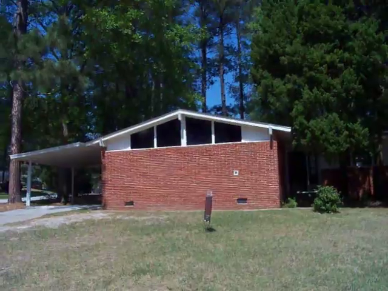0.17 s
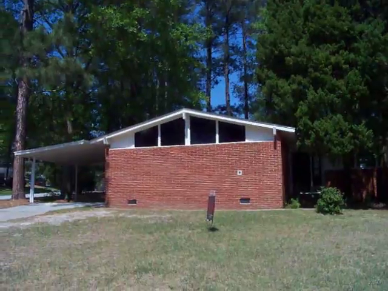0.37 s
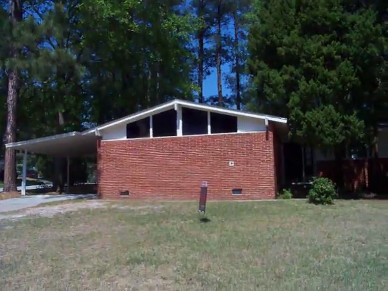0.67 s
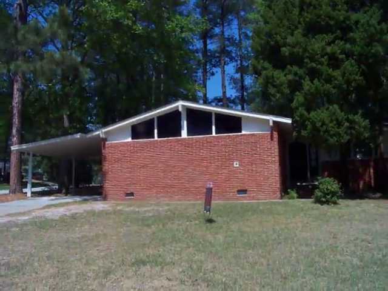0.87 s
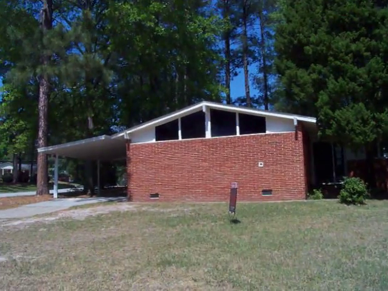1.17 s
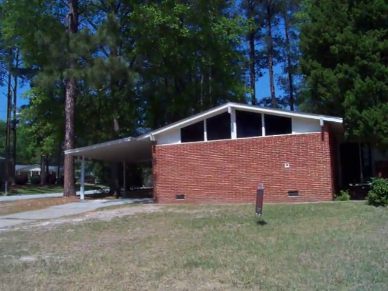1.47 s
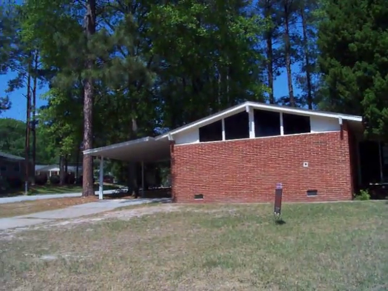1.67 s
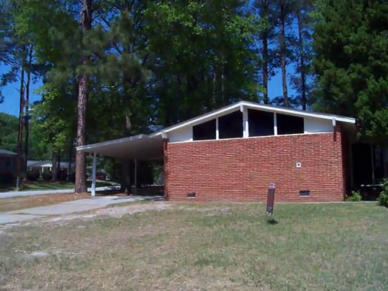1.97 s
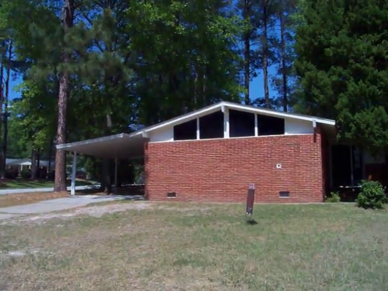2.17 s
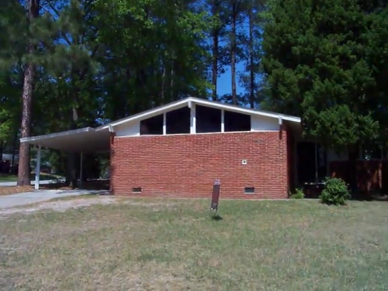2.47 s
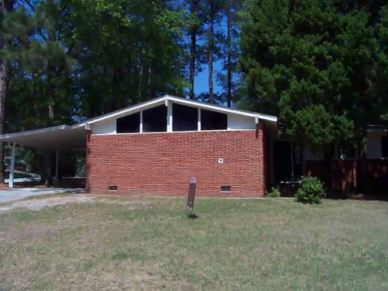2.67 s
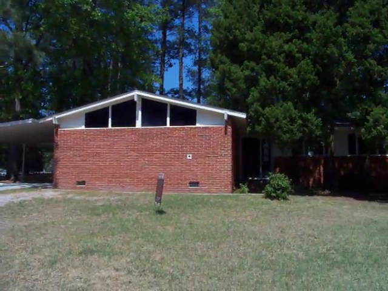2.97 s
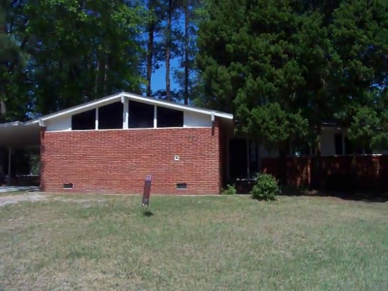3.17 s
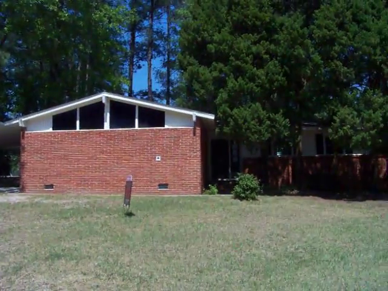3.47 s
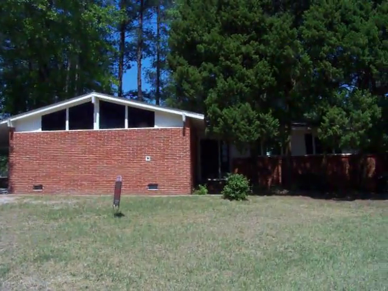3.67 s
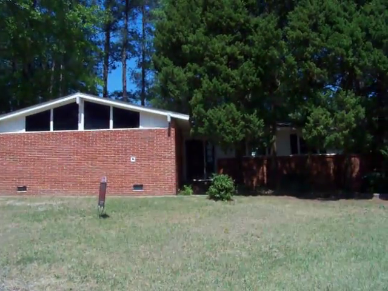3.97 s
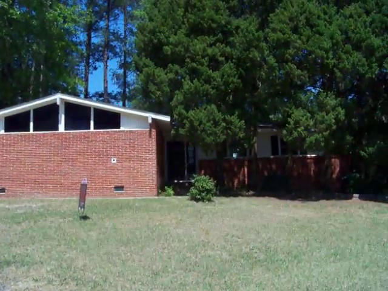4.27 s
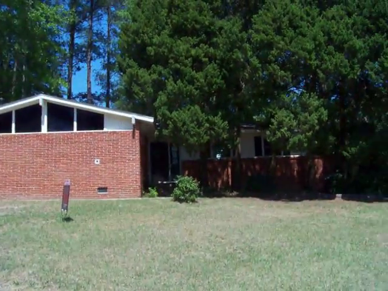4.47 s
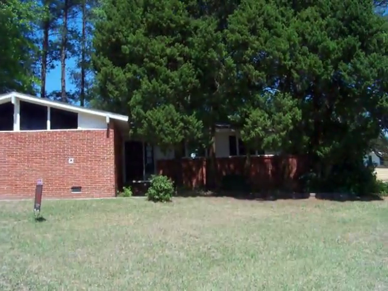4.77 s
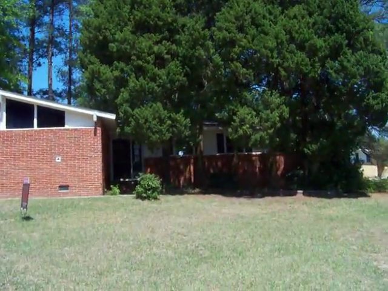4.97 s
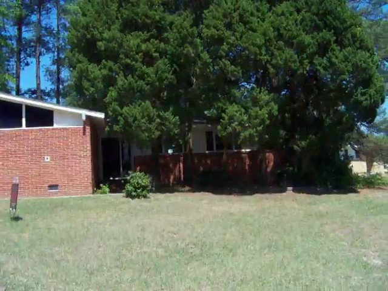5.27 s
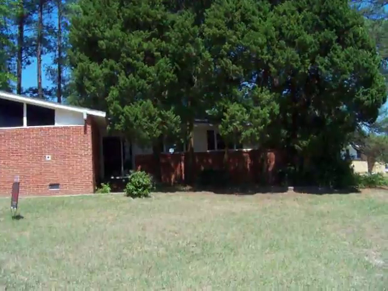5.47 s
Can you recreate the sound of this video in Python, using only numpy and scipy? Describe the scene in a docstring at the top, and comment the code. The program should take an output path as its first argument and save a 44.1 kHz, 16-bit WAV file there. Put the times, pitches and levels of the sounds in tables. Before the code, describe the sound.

A car engine hums low as the car rolls slowly along, heard from inside with tyre and air rush and two plastic knocks.

```python
"""A car engine hums as the car rolls slowly past a house, heard from inside through an open side window.
Exhaust pulses rise in pitch as it gathers speed, boom in the cabin, then sink when the throttle is eased.
Valves and belts rasp, tyres and air rush outside, and faint whines come and go.
Hard plastic close by knocks at the start and ticks again near the end."""
import sys
import numpy as np
from scipy import signal
from scipy.fft import rfft, irfft, next_fast_len
from scipy.io import wavfile

SR = 44100
rng = np.random.default_rng(int(sys.argv[2]) if len(sys.argv) > 2 else 0)


def log_audio(samples):
    """Write samples as a 16-bit WAV file to the path given in sys.argv[1]."""
    # one column per channel
    frames = np.atleast_2d(samples).T
    # limit to full scale, then quantise
    limited = np.clip(frames, -1, 1)
    pcm = np.round(limited * 32767).astype(np.int16)
    wavfile.write(sys.argv[1], SR, pcm)


N = 247842
TIME = np.arange(N) / SR


def from_db(db):
    """Decibels to gain."""
    return 10 ** (np.asarray(db) / 20)


def unit_rms(x):
    """Scale to an rms of 1."""
    return x / np.sqrt(np.mean(x ** 2) + 1e-20)


def automation(rows):
    """One control curve for each column after time_s."""
    times_s, *columns = np.transpose(rows)
    return [np.interp(TIME, times_s, column) for column in columns]


def hump(centre_s, half_s):
    """A bell-shaped rise from 0 to 1 and back."""
    return np.exp(-((TIME - centre_s) / half_s) ** 2)


def drift(rate_hz):
    """Smooth random modulation with an rms of about 1."""
    hop, warm_up = 40, 2000
    pole = np.exp(-2 * np.pi * rate_hz * hop / SR)
    noise = rng.standard_normal(N // hop + warm_up + 2)
    slow = signal.lfilter([1], [1, -2 * pole, pole * pole], noise)[warm_up:]
    return np.interp(np.arange(N) / hop, np.arange(len(slow)), unit_rms(slow))


def coloured_noise(spectrum):
    """Noise of unit rms, shaped by an EQ curve and rolled off beyond its ends."""
    hz, db = np.transpose(spectrum)
    size = next_fast_len(N)
    bins_hz = np.maximum(np.fft.rfftfreq(size, 1 / SR), 1)
    gain = from_db(np.interp(np.log(bins_hz), np.log(hz), db))
    skirts = np.minimum(bins_hz / hz[0], 1) ** 2 * np.minimum(hz[-1] / bins_hz, 1) ** 2
    return unit_rms(irfft(rfft(rng.standard_normal(size)) * gain * skirts, size)[:N])


def tone(phase, level_db, rough):
    """A partial whose level flutters, with `rough` as the depth."""
    return np.sqrt(2) * from_db(level_db) * (1 + rough * drift(21)) * np.cos(phase)


def drive_db(firing_hz, cruise_db, db_per_hz, pass_db, cruise_hz=100):
    """Level that follows engine speed and swells through the window as the car rolls by."""
    return cruise_db + db_per_hz * (firing_hz - cruise_hz) + pass_db * hump(centre_s=2.62, half_s=1.0)


# Cabin resonances: centre_hz, width_hz, lift_db
CABIN_MODES = [(103, 6.5, 3.5), (111.6, 8.3, 12.5), (163.8, 14, 8), (216, 11, -0.5), (261, 29, 4),
               (352, 18, 7), (440, 9.4, 6.5)]

def cabin_lift_db(pitch_hz):
    """The cabin boosts a partial as it sweeps through a resonance."""
    return sum(db / (1 + (2 * (pitch_hz - hz) / width_hz) ** 2) for hz, width_hz, db in CABIN_MODES)


# Engine speed as the cylinders' firing rate: time_s, firing_hz
ENGINE_SPEED = [(0.2, 81.7), (0.5, 86.8), (0.9, 92.1), (1.45, 97.2), (1.65, 97.9), (2.1, 101.1),
                (2.5, 107.2), (2.7, 104.9), (3.1, 107.4), (3.65, 108.2), (4.2, 110.3), (4.55, 112.2),
                (4.8, 111.4), (5.05, 95.7), (5.3, 93.5), (5.62, 94.6)]
# Fuller hum until the car is under way: until_s, settle_s, fundamental_db, lope_db, octave_db
MOVING_OFF_BOOST = (1.34, 0.1, 2.6, 1.8, 4.76)
# Brief swells and sags in the hum: centre_s, half_width_s, fundamental_db, lope_db, octave_db
HUM_RIDES = [(0.266, 0.17, -5, -7, -7), (1.724, 0.38, -1.5, -3.5, -3), (2.28, .14, 2, 1.5, 4),
             (2.73, 0.19, 0, -8, -4), (2.952, .13, 3, -22, -1), (3.352, .17, 2.5, 2.5, 5),
             (3.717, 0.41, -3.5, -1.8, -4.2), (4.276, .12, 2, 0, -2.5), (4.85, .14, -3.5, 1, 1),
             (5.2, .15, -2.5, -5, -4)]
# Upper exhaust partials that make the growl: firing_multiple, gain_db
GROWL_PARTIALS = [(2.5, -3), (3, -1), (3.5, -17.5), (4, -9.5), (5, -13.5), (6, -24)]

def engine(firing_hz, phase, boom_lag_s=0.072):
    """Exhaust pulses boom in the cabin; unequal cylinders add a lope between the firing harmonics."""
    until_s, settle_s, *boost_db = MOVING_OFF_BOOST
    boost = np.outer(boost_db, (1 - np.tanh((TIME - until_s) / settle_s)) / 2)
    rides = sum(np.outer(change_db, hump(s, half_s)) for s, half_s, *change_db in HUM_RIDES)
    fundamental_ride, lope_ride, octave_ride = boost + rides
    lagged_hz = np.interp(TIME - boom_lag_s, TIME, firing_hz)
    fundamental_db = -33 + cabin_lift_db(lagged_hz) + fundamental_ride
    lope_db = -44.5 + cabin_lift_db(1.5 * firing_hz) + lope_ride
    octave_db = -36.5 + cabin_lift_db(2 * firing_hz) + octave_ride + 1.63 * drift(2.7)
    growl_db = -56 + 9.5 * hump(centre_s=0.57, half_s=0.44)  # pulls hardest when moving off
    hum = tone(phase, fundamental_db, rough=0.012) + tone(2 * phase, octave_db, rough=0.067)
    lope = tone(1.5 * phase, lope_db, rough=0.12)
    shake = tone(phase / 2, fundamental_db - 34, rough=0.28)
    growl = sum(tone(multiple * phase, growl_db + db + cabin_lift_db(multiple * firing_hz), rough=0.069)
                for multiple, db in GROWL_PARTIALS)
    return hum + lope + shake + growl


# EQ curve of the valve and belt rasp: frequency_hz, gain_db
RASP_EQ = [(500, -4.5), (630, -11), (690, -2), (880, 1.5), (1020, -2.5), (1200, -7.5), (1500, -2.5),
           (1800, -13.5)]

def valve_rasp(firing_hz, phase):
    """Valves and belts clatter on every turn of the crank: a comb of weak, unsteady partials."""
    hz, db = np.transpose(RASP_EQ)
    comb = np.zeros(N)
    for multiple in np.arange(9, 38) / 2:
        partial_phase = multiple * phase + rng.uniform(0, 2 * np.pi)
        partial_db = np.interp(multiple * firing_hz, hz, db) + 3 * drift(0.94)
        comb += tone(partial_phase, partial_db, rough=0.51)
    return from_db(drive_db(firing_hz, cruise_db=-50, db_per_hz=-0.15, pass_db=8.1)) * unit_rms(comb)


# EQ curves of road rumble, tyre roar, air and hiss: frequency_hz, gain_db
RUMBLE_EQ = [(25, -29.5), (45, -10.5), (70, -7.5), (110, 2), (170, -6.5), (240, -5), (300, -15), (400, -28)]
TYRE_EQ = [(200, -12.5), (340, 0.5), (430, -4.5), (640, -3.5), (710, 0), (900, -1.5), (1200, 0.5),
           (1600, -6), (2200, -8.5), (3200, -27), (5000, -27.5)]
AIR_EQ = [(700, -5.5), (1400, -16.5), (1900, -2), (2500, 0.5), (3200, -5), (3900, -9.5), (5000, -34),
          (7000, -29)]
HISS_EQ = [(2500, -8), (4200, 1.5), (5400, -2), (6200, 0), (6650, 3.5), (7300, -3.5), (8000, -4.5),
           (9000, -11.5)]
# Level of the intake hiss, rising and falling with the throttle: time_s, level_db
HISS_LEVEL = [(0.4, -64), (1.05, -58), (1.92, -67), (2.17, -56), (3.75, -56), (4.25, -54), (5.1, -56),
              (5.62, -59)]

def road_rush(firing_hz, phase):
    """A bed of road rumble, tyre roar, air and hiss; roar and hiss throb with the engine's firing."""
    rumble_db = drive_db(firing_hz, cruise_db=-42.5, db_per_hz=0.3, pass_db=0.46)
    tyre_db = drive_db(firing_hz, cruise_db=-44, db_per_hz=0.03, pass_db=2.93)
    air_db = drive_db(firing_hz, cruise_db=-50.5, db_per_hz=0.27, pass_db=1.3)
    hiss_db, = automation(HISS_LEVEL)
    rumble = from_db(rumble_db + 0.5 * drift(7.2)) * coloured_noise(RUMBLE_EQ)
    tyres = from_db(tyre_db + 0.21 * drift(30)) * coloured_noise(TYRE_EQ)
    air = from_db(air_db + 0.44 * drift(4)) * coloured_noise(AIR_EQ)
    hiss = from_db(hiss_db + 0.79 * drift(20)) * coloured_noise(HISS_EQ)
    return rumble + tyres * (1 + 0.16 * np.cos(phase)) + air + hiss * (1 + 0.091 * np.cos(2 * phase))


# Faint gliding whines: start_s, release_s, start_pitch_hz, end_pitch_hz, level_db
WHINE_GLIDES = [(0.207, 0.702, 1170, 1159, -53.5), (2.0, 2.277, 1447, 1465, -51.5),
                (2.394, 2.55, 1703, 1730, -49), (4.046, 4.16, 2870, 3010, -56.5),
                (4.9, 5.62, 582, 578, -55), (4.75, 5.621, 344.7, 358.5, -56)]

def whines(fade_s=0.027, waver_hz=3.01):
    """Thin wavering tones come and go in the rush."""
    out = np.zeros(N)
    for start_s, release_s, start_hz, end_hz, level_db in WHINE_GLIDES:
        fade_in = np.clip((TIME - start_s) / fade_s, 0, 1)
        fade_out = np.clip((release_s - TIME) / fade_s + 1, 0, 1)
        pitch_hz = np.interp(TIME, [start_s, release_s], [start_hz, end_hz]) + waver_hz * drift(10)
        out += fade_in * fade_out * tone(2 * np.pi * np.cumsum(pitch_hz) / SR, level_db, rough=0.78)
    return out


def ring(force, pitch_hz, t60_s):
    """One resonance: each click sets off a decaying sine."""
    pole = np.exp(-np.log(1000) / (t60_s * SR))
    angle = 2 * np.pi * pitch_hz / SR
    return signal.lfilter([0, np.sin(angle)], [1, -2 * pole * np.cos(angle), pole * pole], force + 1e-18)


# Hits on the plastic: start_s, thud_db, knock_db, tick_db, sizzle_db, half_length_s
PLASTIC_HITS = [(0.2315, -50, -34, -29, -24, 0.00087), (0.3155, -18, -13, -25.5, -22, 0.00089),
                (0.338, -32, -31.5, -27, -34, .0014), (5.119, -55, -50, -52, -30, .001),
                (5.1323, -35, -31, -30, -20.5, 0.00158), (5.1379, -12.5, -27, -29, -21, 0.00082)]
# Ringing modes of the plastic part: pitch_hz, gain_db, t60_s
PLASTIC_MODES = [(265, -11, 0.035), (392, -16.5, 0.042), (1100, -4, 0.017), (1410, -0.5, 0.011),
                 (2280, 1, .003), (2930, -4, .006), (3580, -11.5, 0.0035), (4610, 1, 0.0045),
                 (5730, -3.5, 0.0057), (6850, -7, 0.0064)]

def plastic_knocks(thud_hz=400, knock_hz=1400, tick_hz=4600, sizzle_hz=6000, grit=0.17):
    """Each hit is a snap inside a tiny burst of chatter, ringing the same hard plastic part."""
    bands_hz = [thud_hz, knock_hz, tick_hz, sizzle_hz]
    out = np.zeros(N)
    for pitch_hz, mode_db, t60_s in PLASTIC_MODES:
        force = np.zeros(N)
        for start_s, *bands_db, half_length_s in PLASTIC_HITS:
            at, size = round(start_s * SR), round(2 * half_length_s * SR)
            contact = grit * rng.standard_normal(size) * np.hanning(size + 2)[1:-1] * np.sqrt(2 / size)
            snap_at = rng.integers(size // 2 + 1)
            contact[snap_at] += rng.choice([-1, 1]) * np.sqrt(1 - grit ** 2)
            force[at:at + size] += contact * from_db(mode_db + np.interp(pitch_hz, bands_hz, bands_db))
        out += ring(force, pitch_hz, t60_s)
    return out


# Passing swells in the rush: centre_s, half_width_s, centre_hz, width_hz, level_db
SWELL_BANDS = [(1.255, 0.21, 814, 170, -49), (2.15, 0.4, 820, 195, -49), (2.458, 0.31, 1590, 380, -46),
               (3.004, 0.95, 720, 146.3, -47), (3.097, 0.73, 3160, 434, -51), (4.0, 0.3, 2650, 692, -50),
               (4.447, 0.28, 7873, 874, -63)]

def rush_swells():
    """Single bands of noise swell and fade over the rush."""
    out = np.zeros(N)
    for centre_s, half_s, hz, width_hz, level_db in SWELL_BANDS:
        bandpass = signal.butter(2, [hz - width_hz / 2, hz + width_hz / 2], "band", fs=SR, output="sos")
        band = unit_rms(signal.sosfilt(bandpass, rng.standard_normal(N)))
        out += from_db(level_db) * hump(centre_s, half_s) * band
    return out


# Short echo that hollows the rush near the end: time_s, delay_s, echo_gain
FLANGE_SWEEP = [(5.15, 0.000049, 0.053), (5.21, 0.00017, 0.32), (5.3, 0.00034, 0.36),
                (5.42, 0.00018, 0.036)]

def hollow_flange(rush):
    """A very short echo with a sliding delay draws a dip down through the rush, then recedes."""
    delay_s, echo_gain = automation(FLANGE_SWEEP)
    echo = np.interp(TIME - delay_s, TIME, rush)
    return (rush + echo_gain * echo) / np.sqrt(1 + echo_gain ** 2)


def scene():
    """A mono mix inside the cabin, with one engine speed driving hum, rasp and rush."""
    firing_hz, = automation(ENGINE_SPEED)
    phase = 2 * np.pi * np.cumsum(firing_hz * (1 + 0.002 * drift(8.8))) / SR
    motor = engine(firing_hz, phase) + valve_rasp(firing_hz, phase)
    outside = hollow_flange(road_rush(firing_hz, phase)) + rush_swells()
    return (motor + outside + whines() + plastic_knocks())[None, :]


# Narrow cuts in the output EQ: centre_hz, width_hz
EQ_NOTCHES = [(303, 51), (966, 65)]

def record(dry, start_s=0.202, fade_s=0.004, rolloff_hz=7300, cutoff_hz=8845):
    """The sound opens after a moment, with two narrow notches, dulled treble and the top cut off."""
    out = dry * np.clip((TIME - start_s) / fade_s, 0, 1)
    for hz, width_hz in EQ_NOTCHES:
        out = signal.lfilter(*signal.iirnotch(hz, hz / width_hz, fs=SR), out)
    out = signal.sosfilt(signal.butter(10, rolloff_hz, fs=SR, output="sos"), out)
    return signal.sosfilt(signal.ellip(10, 0.1, 80, cutoff_hz, fs=SR, output="sos"), out)


dry = scene()
out = record(dry)
log_audio(out)
```